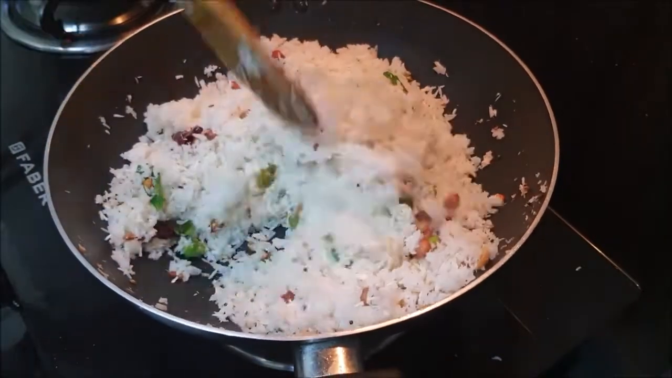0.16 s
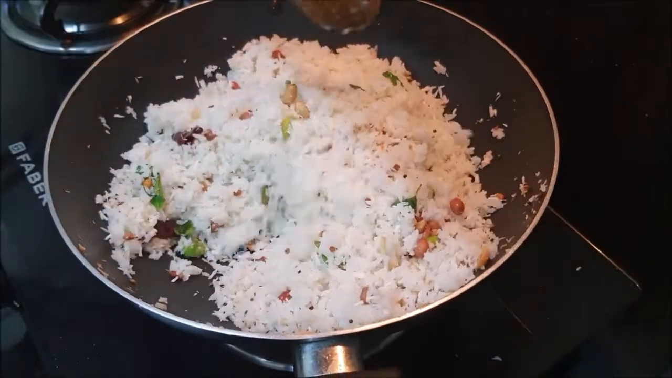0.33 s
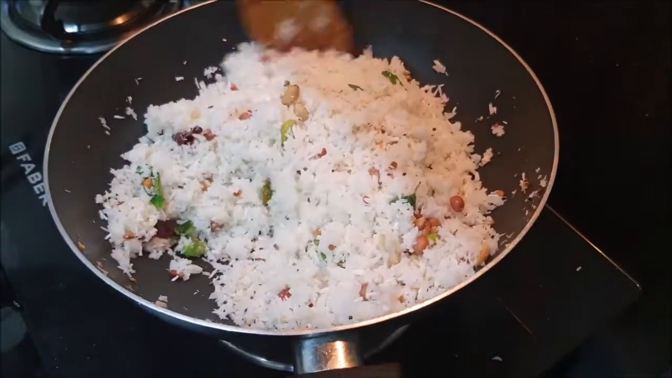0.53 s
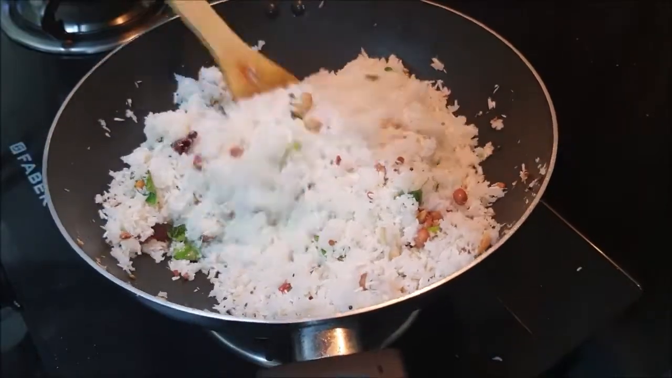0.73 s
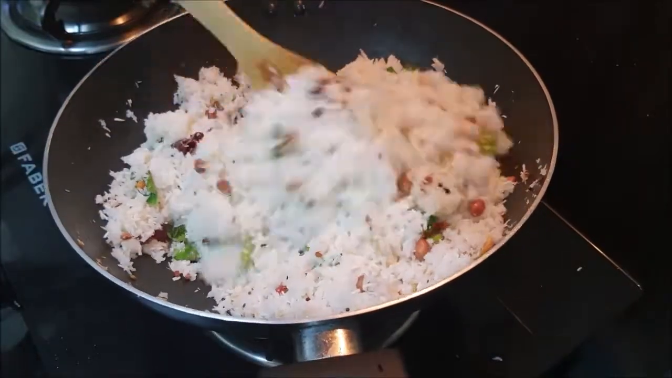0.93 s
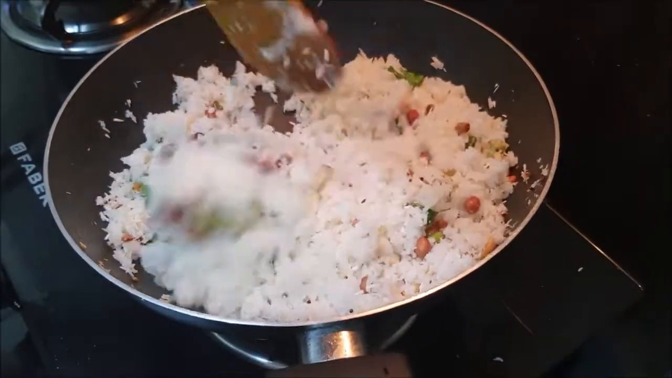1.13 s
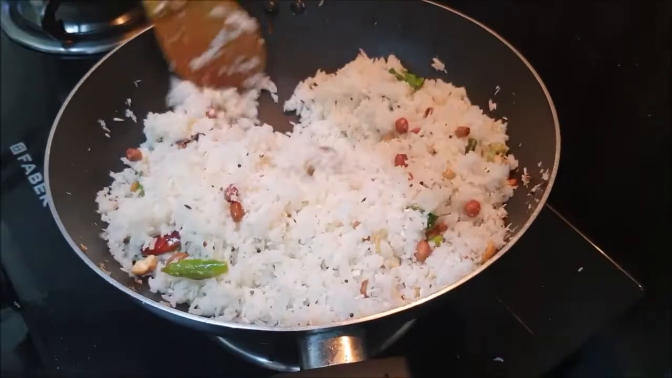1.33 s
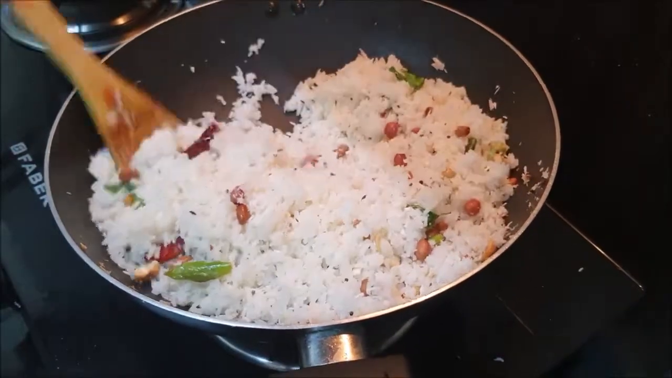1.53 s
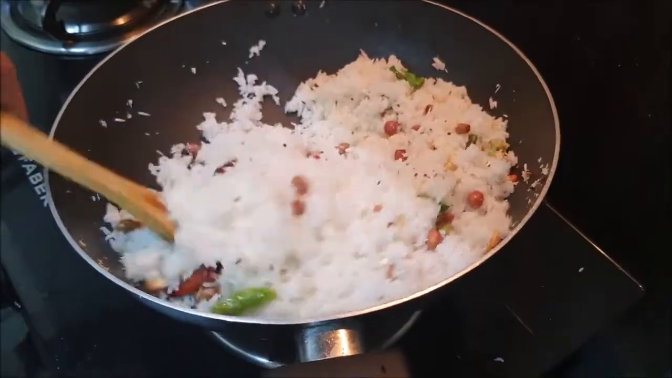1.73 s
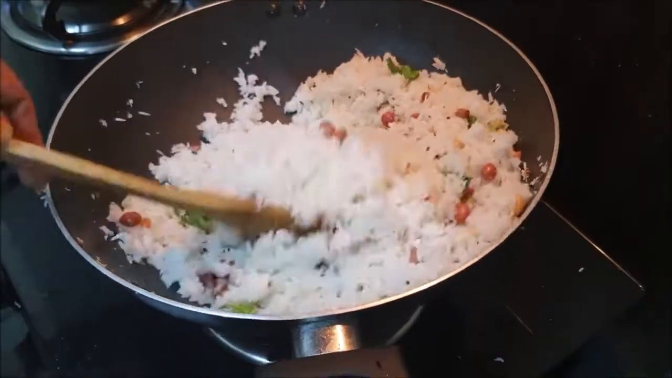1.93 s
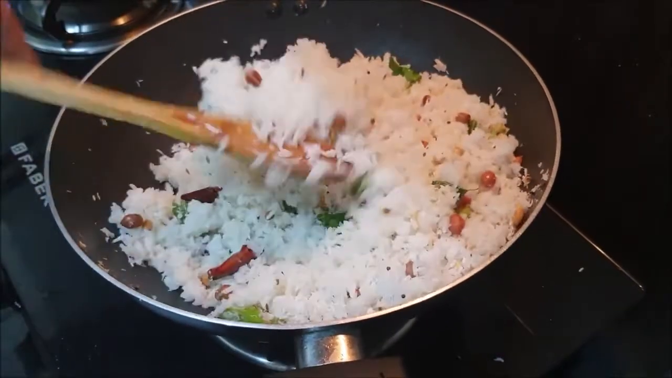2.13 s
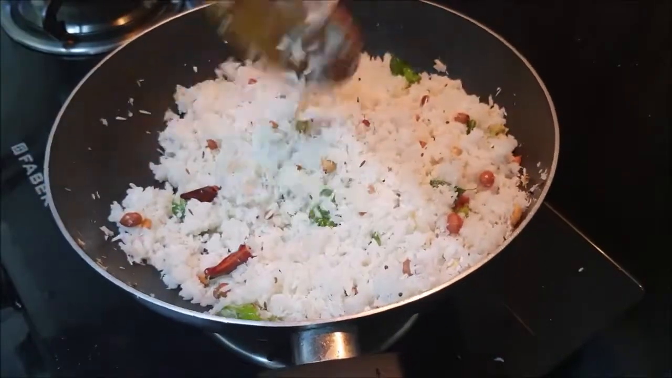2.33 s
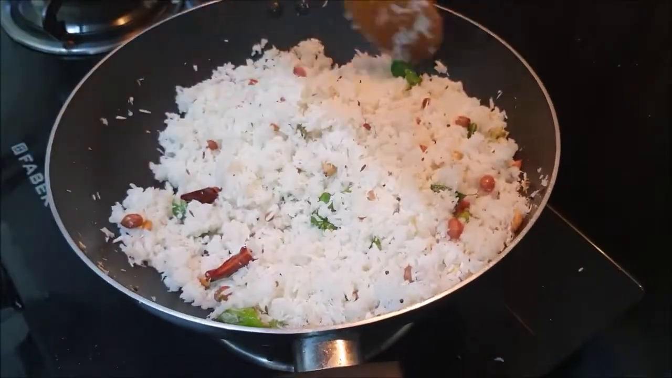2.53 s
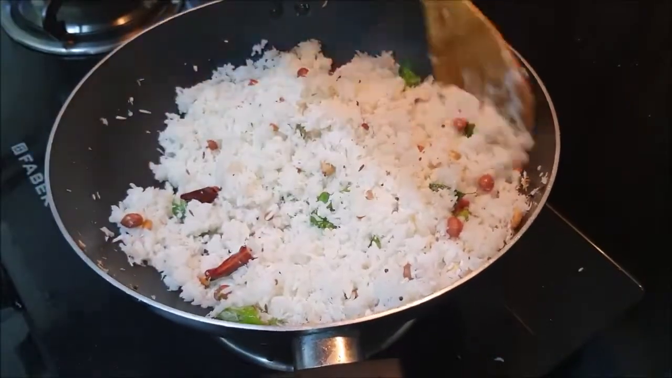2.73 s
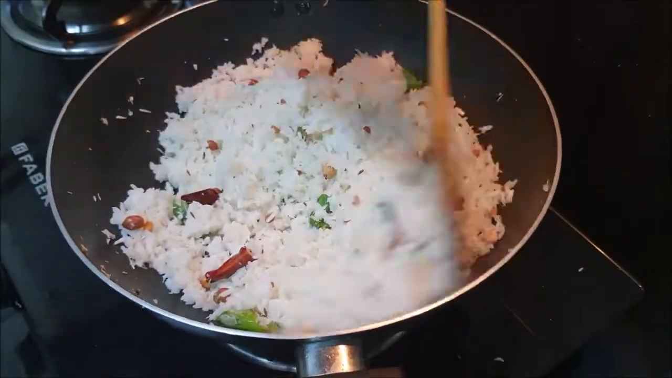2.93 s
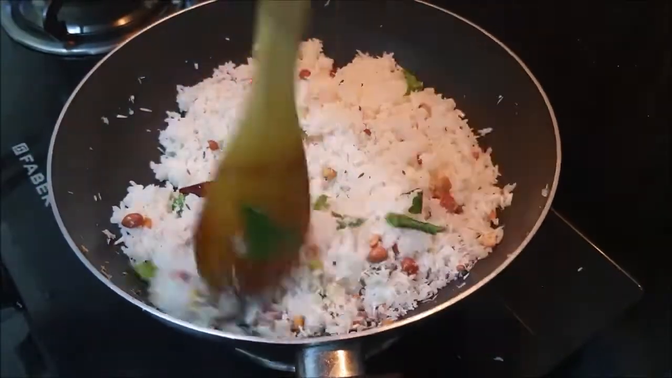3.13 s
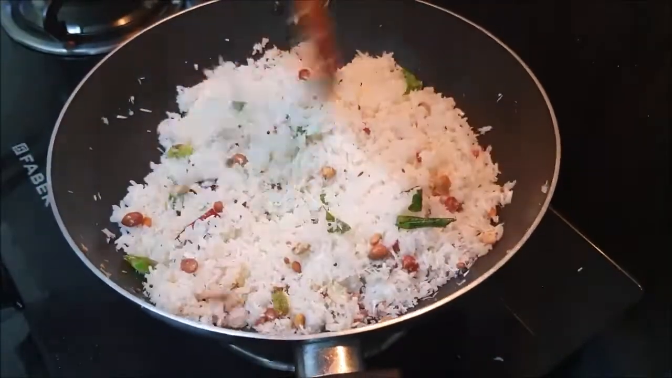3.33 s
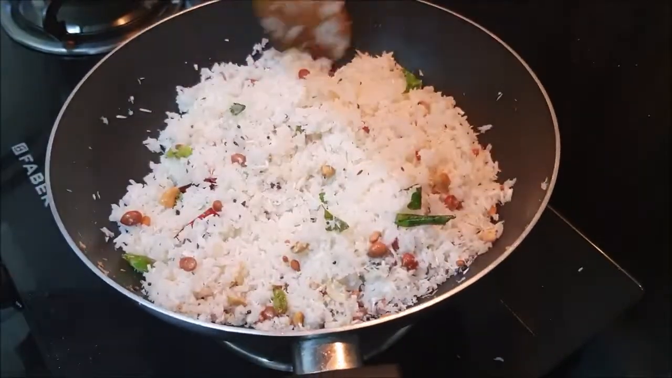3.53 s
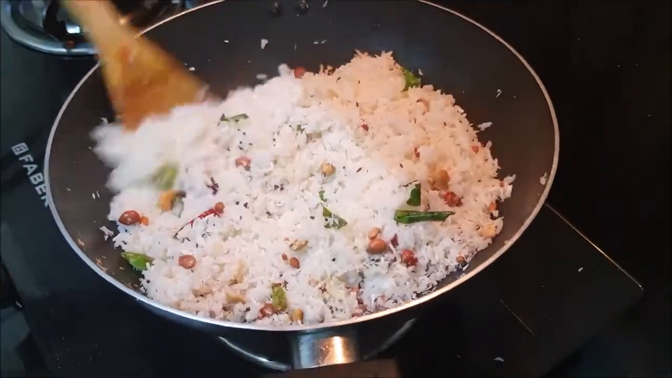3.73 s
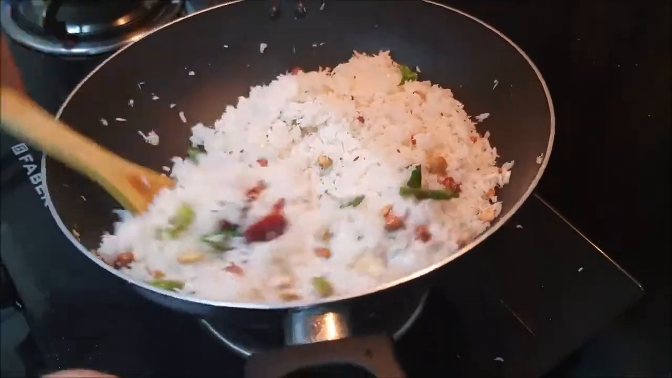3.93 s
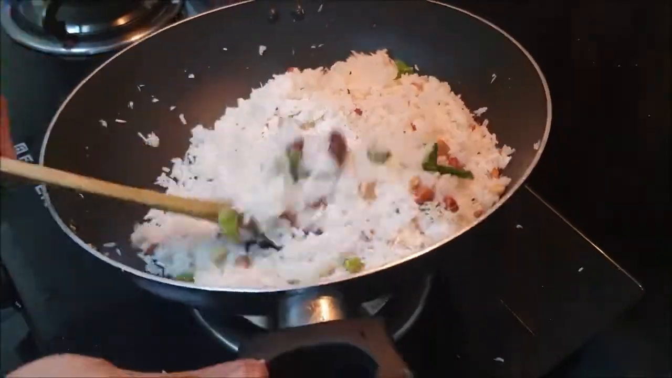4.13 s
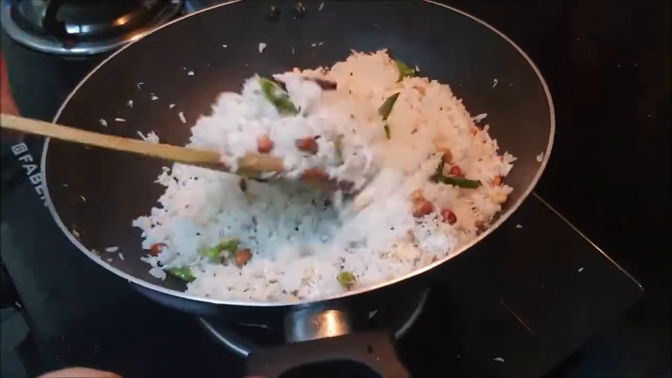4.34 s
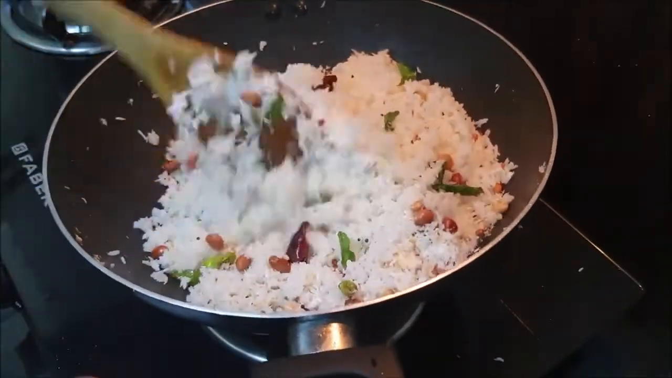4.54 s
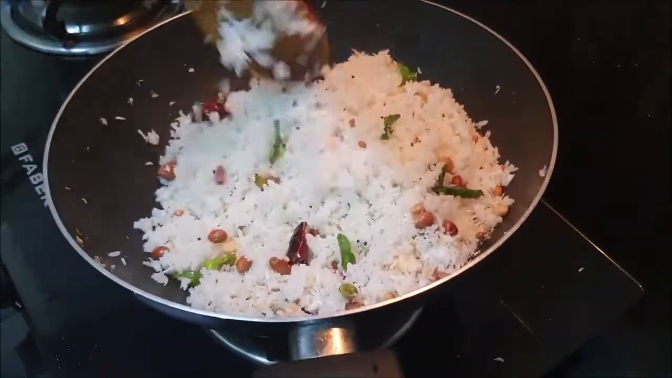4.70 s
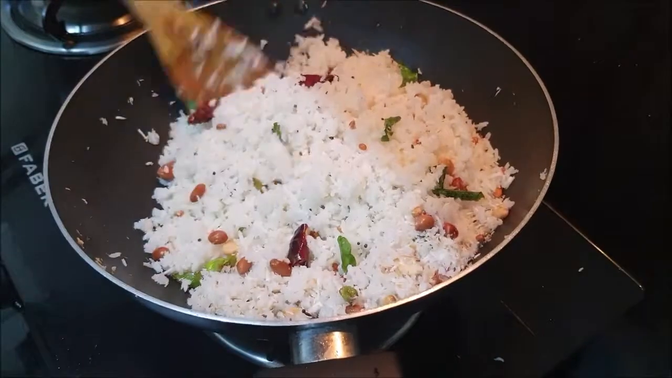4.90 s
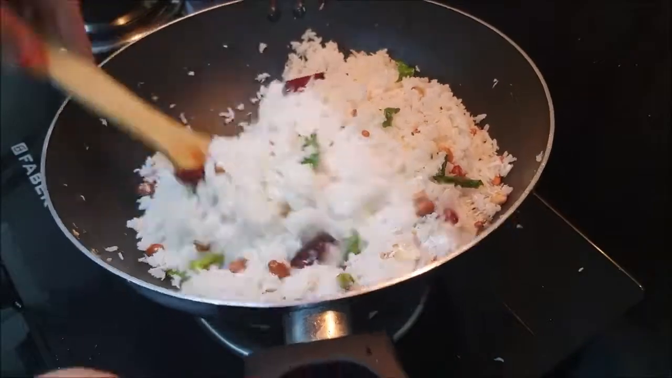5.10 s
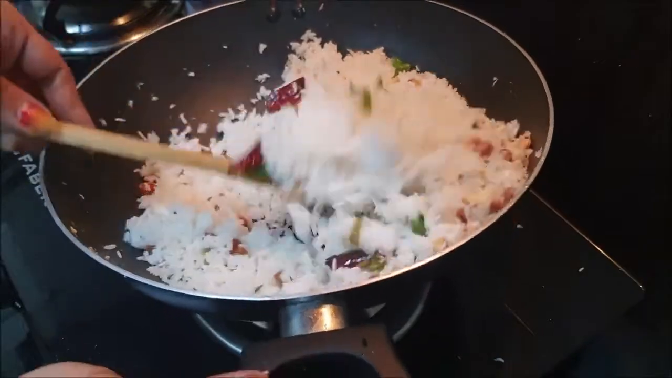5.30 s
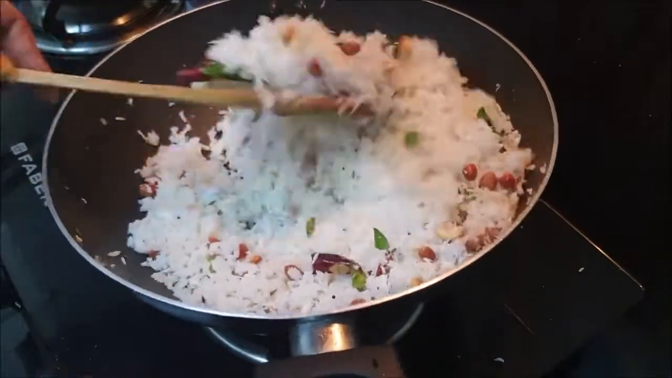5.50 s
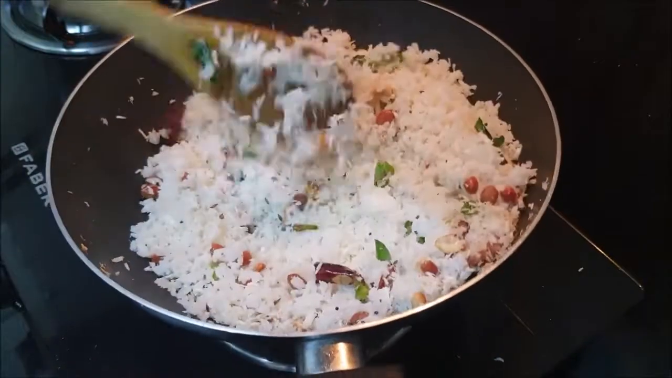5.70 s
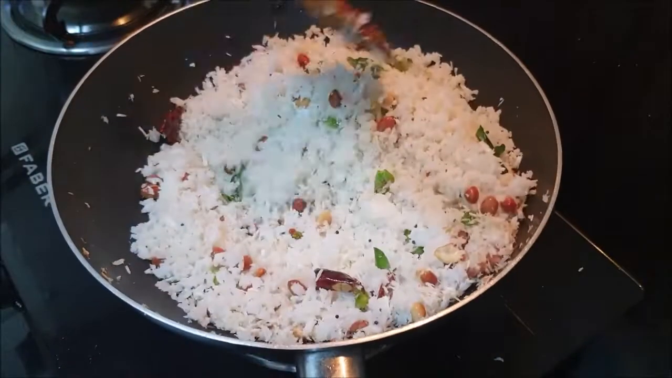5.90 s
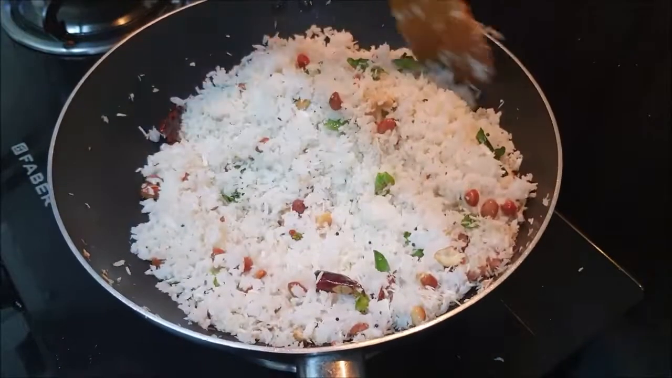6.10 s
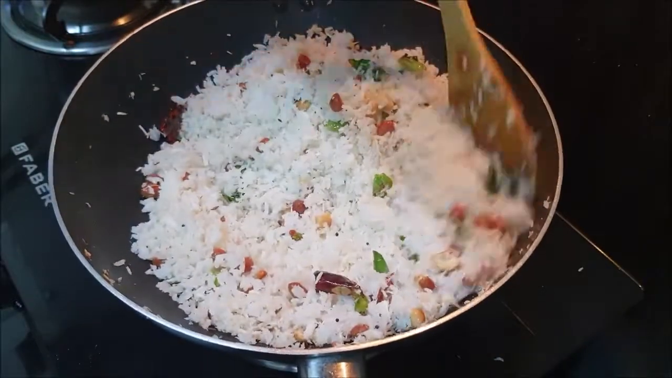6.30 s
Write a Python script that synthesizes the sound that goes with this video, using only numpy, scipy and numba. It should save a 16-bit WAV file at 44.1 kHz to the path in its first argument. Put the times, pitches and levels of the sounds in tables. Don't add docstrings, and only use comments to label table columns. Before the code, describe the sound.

Close sizzling and bright popping spits fade gradually as a wooden blade drags through rice in uneven strokes, tapping the pan over a low hum.

```python
import sys
import numpy as np
from scipy import signal
from scipy.fft import rfft, irfft, next_fast_len
from scipy.io import wavfile
from scipy.ndimage import map_coordinates
from numba import njit

SR = 44100
rng = np.random.default_rng(int(sys.argv[2]) if len(sys.argv) > 2 else 0)


def materialize(psi):
    bounded = np.clip(np.atleast_2d(psi).T, -1, 1)
    quanta = np.round(bounded * 32767).astype(np.int16)
    wavfile.write(sys.argv[1], SR, quanta)


def invert_db(x):
    u = np.asarray(x, float) / 20
    return 10 ** u


N = 284709

# (frequency [Hz], level [dB per Hz])
AIR = [(15, -38), (25, -13), (75, -0.5), (152, -1.5), (209, -8.5), (389, 4.5), (629, -3), (695, -2),
       (3000, -9), (3900, -19), (6600, -120)]
# (frequency [Hz], width [Hz], level [dB])
STAND = [(59.6, 9.9, 6), (118, 18, -13.5), (184, 27, -13.5)]
# (time [s], fizz level [dB])
BARED = [(0, -45.5), (.2, -50.5), (.57, -49), (.77, -42), (1.05, -49.5), (1.52, -44), (2.05, -45),
         (2.42, -52), (2.85, -49), (3.2, -43), (3.31, -54.5), (3.7, -59), (3.85, -50), (4.45, -55.5),
         (4.98, -62), (5.03, -46), (5.45, -53.5), (6.456, -59)]
# (frequency [Hz], level [dB per Hz])
FIZZ = [(470, 3), (800, -13), (1040, -16), (1230, -8.5), (2000, -7.5), (2440, -9), (3690, -5.5), (7540, 1),
        (9220, -5), (14800, -2.5), (16000, -10.5)]
# (time [s], blade pressure [dB], blade resonance [Hz])
STROKES = [
    [(0, -54, 2070), (.084, -45.5, 2120), (.13, -52, 2100), (.17, -64, 2100)],
    [(.565, -39, 2000), (.63, -50, 1900), (.66, -44, 1850), (.85, -41, 2050), (.93, -47, 1950),
     (1.0, -62, 1970)],
    [(1.472, -45, 2000), (1.52, -40, 2030), (1.6, -47, 1950), (1.72, -43, 1900), (1.85, -56, 1900),
     (2.4, -61, 1600)],
    [(2.755, -53, 1810), (2.945, -52, 1900), (3.0, -41, 2060), (3.085, -53, 2060), (3.3, -60, 2110)],
    [(3.71, -46, 1650), (3.77, -37, 1620), (3.87, -28.5, 2000), (3.96, -34.5, 1950), (4.03, -51, 1950),
     (4.3, -62, 2060)],
    [(5.005, -46.5, 2000), (5.07, -43, 2150), (5.13, -47, 2100), (5.235, -38.5, 2000), (5.28, -49, 2010),
     (5.4, -68, 1970)],
    [(6.22, -68, 1980), (6.27, -66, 1960), (6.308, -66, 1960)],
    [(6.35, -57, 2500), (6.41, -50, 2300), (6.456, -53, 2050)],
]
# (pan wall [dB], low rim [dB], rasp [dB], free rim ring [dB], push on the stand [dB])
TOUCH = [(-56, -53, -46, -11, -72), (-56, -52, -47, -20, -63), (-52, -55, -50.5, -18, -76),
         (-54, -57, -51, -13, -65), (-47, -51, -47.5, -11, -62), (-53, -46, -50, -18, -64),
         (-63, -70, -72, 5, -80), (-57, -68, -59.5, -16, -80)]
# (frequency [Hz], width [Hz], level [dB])
BLADE = [(1526, 45, -2.5), (1670, 76, 1.5), (1828, 25, 3), (1900, 107, -2.5), (2060, 68, 0.5),
         (2180, 58, -3.5), (2338, 24, 0)]
# (frequency [Hz], width [Hz], level [dB])
PAN = [(313, 92, -12), (439, 21, 1.5), (483, 92, -6.5), (733, 59, -0.5)]
# (frequency [Hz], width [Hz], level [dB])
LOW_RIM = [(1010, 350, -5), (1270, 100, -1)]
# (frequency [Hz], width [Hz], level [dB])
SQUEAK = [(1274, 22, 2), (3200, 120, -2), (4770, 90, -12)]
# (frequency [Hz], level [dB per Hz])
GRIT = [(1500, -31), (2800, -1), (4500, 0.5), (7000, 1.5), (10000, -5), (16000, -6)]
# (time [s], peak level [dB], jet colour [Hz], low snap [dB])
SPITS = [(.4339, -14.5, 4900, -26), (.5556, -14, 4500, -12), (.604, -12.5, 6800, -25),
         (.6533, -15, 5350, -16.5), (.7482, -8.5, 6050, -19.5), (.8936, -17, 7800, -21),
         (1.2122, -16, 5770, -25), (1.2315, -12, 11700, -28), (1.2445, -8.5, 8500, -29),
         (1.3529, -15.5, 6000, -24.5), (1.5894, -14, 7400, -20), (1.6142, -12.5, 7550, -21.5),
         (1.6864, -5, 7000, -17), (1.9036, -12, 6000, -33), (2.0303, -14.5, 7400, -28),
         (2.2172, -13.5, 8620, -33), (2.5065, -10, 6100, -22.5), (2.6601, -15.5, 6760, -23.5),
         (2.9568, -18, 7520, -24), (3.1075, -17, 7800, -28), (3.2056, -15, 6500, -28),
         (3.2832, -19, 6500, -26), (3.4453, -16, 6500, -27), (3.711, -14, 7940, -29),
         (3.732, -15.5, 4720, -24), (4.0018, -14.5, 7500, -22), (4.2014, -15, 7000, -20),
         (4.3262, -15.5, 6100, -25), (5.296, -12.5, 6950, -22.5), (5.67, -3.5, 6100, -45)]
# (time [s], peak level [dB])
TICKS = [(.2387, -18), (.2815, -21), (.3407, -19), (.3726, -20), (.4116, -17.5), (.4619, -18.5),
         (.502, -16.5), (1.054, -19), (1.1767, -22), (1.3903, -18.5), (1.425, -19.5), (.1306, -20),
         (2.3441, -24), (1.6795, -10), (2.5925, -21), (2.6375, -20), (5.426, -24), (2.7746, -18),
         (2.7948, -18), (3.3884, -26), (4.2752, -22), (4.5065, -29.5), (4.6543, -26), (5.6096, -21),
         (5.818, -26), (5.9228, -28), (5.9738, -25), (6.0254, -29), (6.2033, -27), (6.2706, -21)]
# (time [s], peak level [dB], thump [dB], clack [dB], rim ring [dB])
KNOCKS = [(0.553, -30.5, -30, -8, 2), (1.472, -47, -37, 11, 2), (2.717, -39, -24, -4, -9),
          (2.727, -35, -19, -30, -20), (2.746, -50, -8, -11, -8), (3.555, -55.5, -14, 22, -4),
          (3.704, -52.5, -8, 2, 8), (4.138, -45, -28, 14, -13), (4.998, -44, -16, 11, -18),
          (5.296, -44.5, -19, 2, 18), (6.346, -50, -20, -5, 6)]
# (frequency [Hz], width [Hz], level [dB])
STRUCK = [(283, 30, -12), (462, 50, -5), (720, 160, -10)]
# (frequency [Hz], width [Hz], level [dB])
THUD = [(65, 25, -1), (121, 36, 0.5), (197, 90, -5)]
# (frequency [Hz], width [Hz], level [dB])
RIM = [(1274, 35, -8.5), (3245, 80, -0.5), (4770, 76, 3), (6000, 200, -2.5), (7120, 80, 5), (8660, 90, -6),
       (11360, 110, -3.5), (12300, 120, -18), (14000, 120, -14)]
# (frequency [Hz], time to fall 60 dB [s])
WALLS = [(200, 0.2), (2000, 0.2), (12000, 0.1)]

REST_DB, SETTLE_S = -73, .25
WALL_FOLLOWS, RIM_FOLLOWS, RASP_FOLLOWS = .5, .9, .45
WALL_FADES_DB, RIM_RISES_DB = 5, 8
TICK_HZ, TICK_SPREAD_HZ, TICK_SNAP_DB = 6800, 700, -22
VENT_T60_S, VENT_GROWS_S_PER_DB = .022, .0003
SPRAY_FOLLOWS = .4
TOP_HZ = 15900


def unit(x):
    return x / np.sqrt(np.mean(x ** 2) + 1e-20)


def along(points, hz):
    f, v = np.transpose(points)
    return np.interp(np.log(hz + 1), np.log(f + 1), v)


def curves(rows):
    s, *cols = np.transpose(rows)
    return [np.interp(np.arange(N) / SR, s, c) for c in cols]


def wobble(rate):
    knots = rng.standard_normal(int(N * rate / SR) + 4)
    return map_coordinates(knots, [np.arange(N) * rate / SR])


def filtered(x, response):
    m = next_fast_len(len(x) + 8192)
    return irfft(rfft(x, m) * response(np.fft.rfftfreq(m, 1 / SR)), m)[..., :len(x)]


def coloured(x, points):
    return filtered(x, lambda hz: invert_db(along(points, hz)))


def modes(table):
    def response(f):
        total = 0
        for k, (c, w, db) in enumerate(table):
            total = total + (-1) ** k * invert_db(db) * 1j * f * w / (c * c - f * f + 1j * f * w)
        return total
    return response


def grains(per_s, spread_db):
    happens, sign, size = rng.random((3, N))
    return (happens < per_s / SR) * np.sign(sign - .5) * invert_db(-spread_db * np.log(size + 0.012))


@njit
def resonate(x, turn, keep):
    y = np.zeros(len(x))
    for i in range(2, len(x)):
        y[i] = x[i] - x[i - 2] + 2 * keep * np.cos(turn[i]) * y[i - 1] - keep * keep * y[i - 2]
    return y


def kitchen():
    air = invert_db(-64) * unit(coloured(rng.standard_normal(N), AIR))
    fan_hz = 148 + 2.44 * wobble(6)
    fan = invert_db(-71 + 1.8 * wobble(6.4)) * np.sin(2 * np.pi * np.cumsum(fan_hz) / SR)
    since = np.arange(N) / SR - np.array([[table[0][0]] for table in STROKES])
    settling = (since >= 0) * np.exp(-np.abs(since) / SETTLE_S)
    push = invert_db(REST_DB) + np.sum(invert_db(np.array(TOUCH)[:, 4:]) * settling, axis=0)
    return air + fan + push * unit(filtered(rng.standard_normal(N), modes(STAND)))


def fizz():
    t = np.arange(600) / SR
    level_db = curves(BARED)[0]
    pops = grains(per_s=150, spread_db=3.5) * invert_db(-.4 * (level_db + 50))
    flares = signal.fftconvolve(np.abs(pops), invert_db(-60 * t / 0.026))[:N]
    hiss = rng.standard_normal(N) * (1.0 + .9 * unit(flares)) * invert_db(1.2 * wobble(12))
    crackle = unit(hiss) + invert_db(-7) * unit(pops)
    crackle = crackle + invert_db(-6) * unit(grains(per_s=900, spread_db=2))
    oil = filtered(crackle, lambda hz: invert_db(along(FIZZ, hz)) / (1 + (600 / (hz + 1)) ** 4))
    return invert_db(level_db + 5.0) * unit(oil)


def strokes():
    rows = []
    hush = np.array([0, -40, 0, -40, -40, -40, 0])
    for table, (wall_db, rim_db, rasp_db, free_db, _) in zip(STROKES, TOUCH):
        s, press_db, hz = np.transpose(table)
        eased = press_db - press_db.max()
        way = (s - s[0]) / (s[-1] - s[0]) - .5
        wall = wall_db + WALL_FOLLOWS * eased - WALL_FADES_DB * way
        rim = rim_db + RIM_FOLLOWS * eased + RIM_RISES_DB * way
        rasp = rasp_db + RASP_FOLLOWS * eased
        block = np.transpose([s, press_db, hz, wall, rim, rasp, free_db + 0 * s])
        before = block[0] + hush
        before[0] -= .012
        after = block[-1] + hush
        after[0] += .03
        rows += [before, *block, after]
    return curves(rows)


def slips():
    ticks = unit(grains(per_s=1800, spread_db=3))
    return (ticks + 0.69 * rng.standard_normal(N)) * invert_db(2.03 * wobble(70))


def ring(table, unsteady_db):
    each = filtered(slips(), lambda f: np.array([modes([mode])(f) for mode in table]))
    return unit(sum(invert_db(unsteady_db * wobble(14)) * one for one in each))


def drag():
    blade_db, blade_hz, pan_db, low_rim_db, rim_db, free_db = strokes()
    wood = ring(BLADE, unsteady_db=2.5) + invert_db(-0.3) * unit(slips())
    blade = unit(resonate(wood, 2 * np.pi * blade_hz / SR, np.exp(-np.pi * 700 / SR)))
    rasp = unit(coloured(slips(), GRIT))
    rasp = rasp + invert_db(free_db) * ring(SQUEAK, unsteady_db=3.5)
    metal = invert_db(low_rim_db + 2.0) * ring(LOW_RIM, unsteady_db=3.5) + invert_db(rim_db + 10.5) * rasp
    return invert_db(blade_db + 0.64) * blade + invert_db(pan_db - 1.9) * ring(PAN, unsteady_db=4.0) + metal


def spits():
    out, t = np.zeros(N + SR), np.arange(3000) / SR
    small = []
    for s, db in TICKS:
        small.append((s, db, TICK_HZ + TICK_SPREAD_HZ * rng.standard_normal(), TICK_SNAP_DB))
    for s, db, colour_hz, snap_db in list(SPITS) + small:
        t60 = max(VENT_T60_S + VENT_GROWS_S_PER_DB * (db + 20), .004)
        venting = invert_db(-60 * t / t60) * (1 - np.exp(-t / 0.00084))
        jet, snap = rng.standard_normal((2, len(t))) * venting
        jet[:30], jet[30] = 0, 3.8
        snap[:30], snap[30] = 0, 3.5
        spray_db = -8 + SPRAY_FOLLOWS * min(snap_db + 26, 0)
        steam = filtered(jet, modes([(colour_hz, 2200, 0.5), (10000, 14000, spray_db)]))
        high = filtered(jet, lambda f: modes([(colour_hz, 2200, 0.5), (10000, 14000, spray_db)])(f)
                        * (1j * f / (.42 * colour_hz + 1j * f)) ** 3)
        low = filtered(snap, modes([(2200, 2300, 0)]))
        out[round(s * SR):][:len(t)] += invert_db(db - 2.2) * (high + invert_db(snap_db + 13.5) * low)
    return out[:N]


def knocks():
    wall, stand, blade, rim = np.zeros((4, N))
    t = np.arange(1500) / SR
    for s, db, thump_db, clack_db, ring_db in KNOCKS:
        blow = rng.standard_normal(len(t))
        i = round(s * SR) + 50
        wall[i:i + 70] += invert_db(db + 19.5) * np.hanning(70)
        stand[i:i + 90] += invert_db(db + thump_db + 21.5) * np.hanning(90)
        blade[i:i + len(t)] += invert_db(db + clack_db + 6.5) * blow * invert_db(-60 * t / 0.016)
        rim[i:i + len(t)] += invert_db(db + ring_db + 10) * blow * invert_db(-60 * t / 0.064)
    clack = modes([(1150, 600, 0), (1740, 730, 4), (2350, 500, 4.5), (3300, 660, -11)])
    pan = filtered(wall, modes(STRUCK)) + filtered(stand, modes(THUD))
    return pan + filtered(blade, clack) + filtered(rim, modes(RIM))


def walls(x):
    out, step = np.zeros(N + SR), SR // 4
    for i in range(0, N, step):
        hz, t, z = signal.stft(rng.standard_normal(SR // 4), SR, nperseg=256)
        fading = invert_db(-60 * t / along(WALLS, hz)[:, None])
        tail = signal.istft(z * fading, SR, nperseg=256)[1]
        echo = signal.fftconvolve(x[i:i + step], tail / np.linalg.norm(tail))
        out[i + 150:][:len(echo)] += echo
    return out[:N]


def scene():
    sharp = spits() + knocks()
    return (fizz() + drag() + sharp + invert_db(-4.5) * walls(sharp) + kitchen())[None]


def low_pass(x):
    return signal.sosfilt(signal.butter(12, 16830, fs=SR, output="sos"), x)


def record(dry):
    kept = filtered(dry[0], lambda hz: np.where(hz < TOP_HZ, 1, invert_db(-60)))
    return low_pass(kept[None])


dry = scene()
out = record(dry)
materialize(out)
```